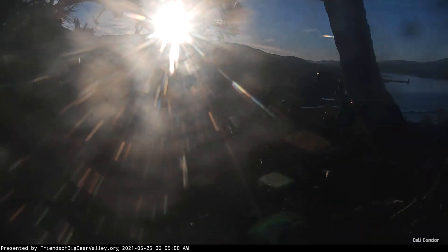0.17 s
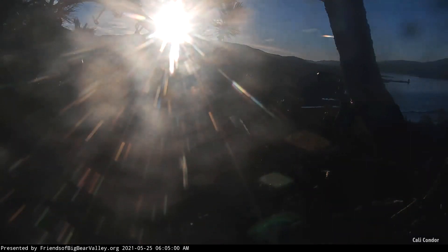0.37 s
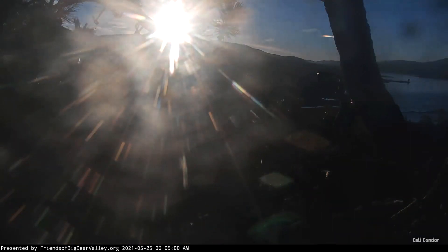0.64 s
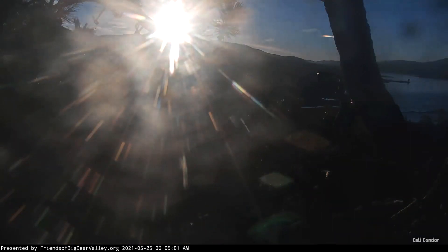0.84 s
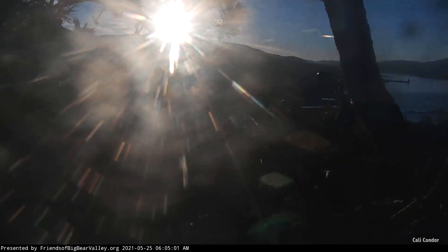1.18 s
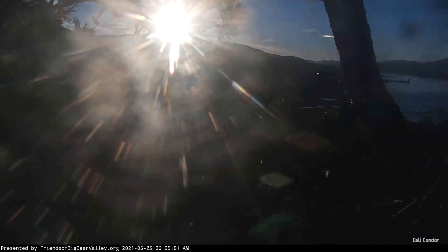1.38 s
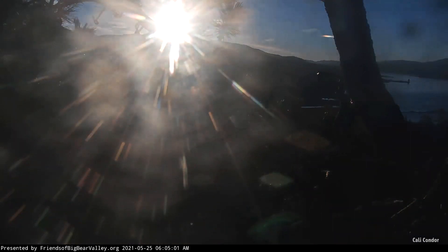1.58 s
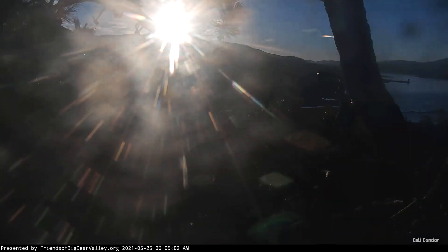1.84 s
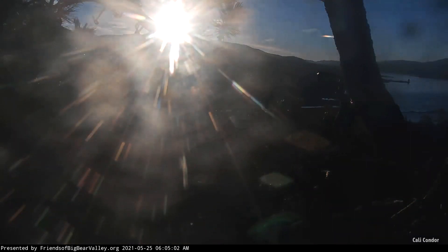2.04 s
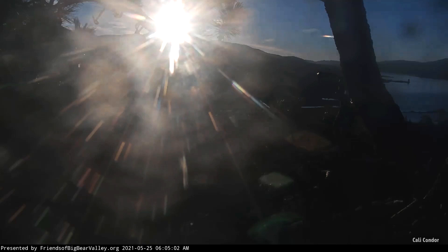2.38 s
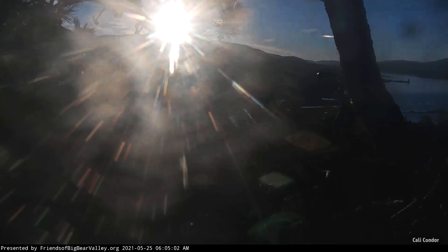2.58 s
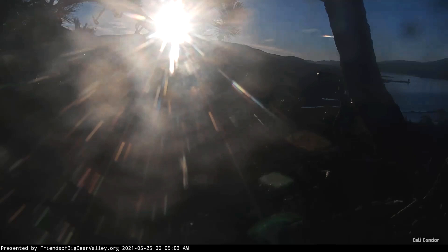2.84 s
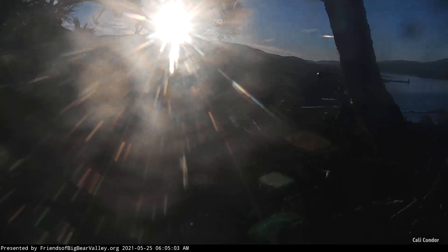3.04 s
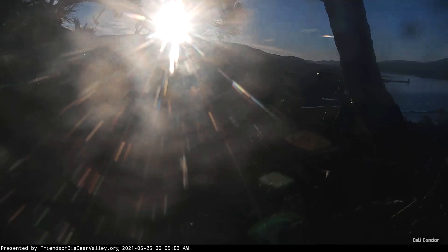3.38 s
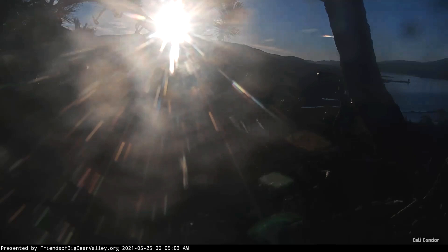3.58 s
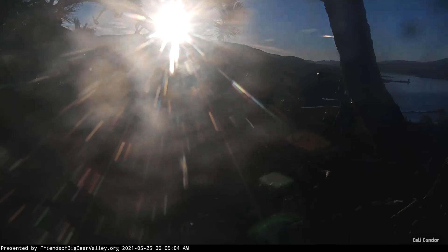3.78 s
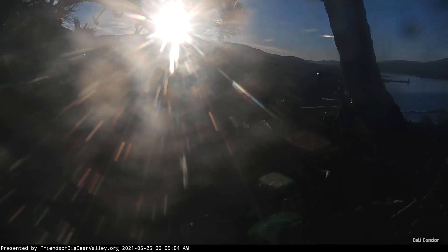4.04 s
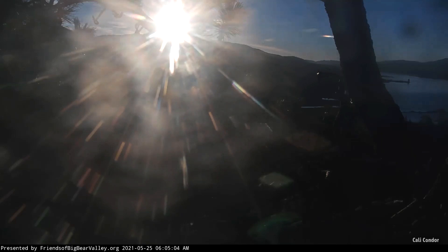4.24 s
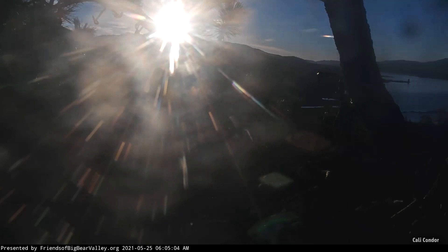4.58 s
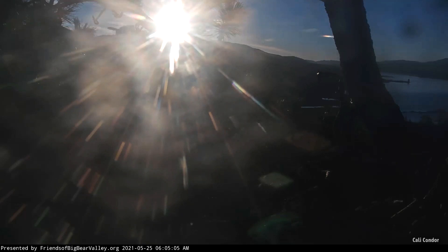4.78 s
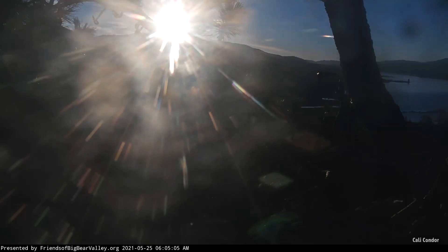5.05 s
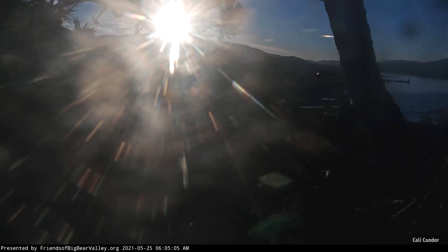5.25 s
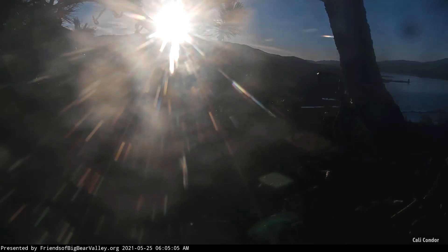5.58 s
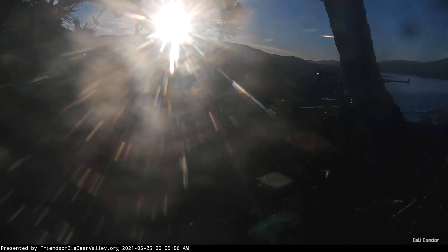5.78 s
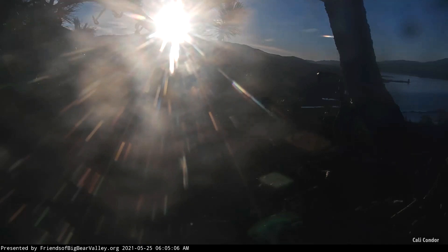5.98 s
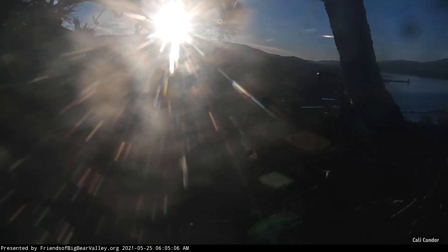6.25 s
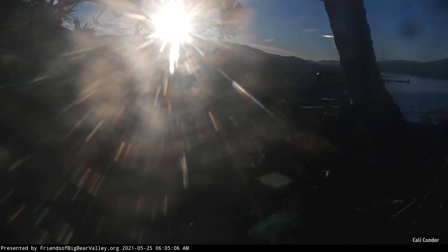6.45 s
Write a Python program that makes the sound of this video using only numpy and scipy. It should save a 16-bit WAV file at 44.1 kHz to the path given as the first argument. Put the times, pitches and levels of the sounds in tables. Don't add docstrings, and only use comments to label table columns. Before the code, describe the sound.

A quiet forest at dawn, heard from a small microphone in a tree. One bird repeats a short nasal, upward-arching call for three seconds over thin whistles, falling chips and quick trills. A two-note see-saw song follows, then the birds thin out and claws rasp, tick and knock on bark very close, loudest near the end. Low throbbing hum, soft air and a distant chorus lie beneath, and notes scatter in a lumpy woodland echo.

```python
import sys
import numpy as np
from scipy import signal
from scipy.fft import rfft, irfft, next_fast_len
from scipy.io import wavfile
from scipy.ndimage import uniform_filter1d, map_coordinates

SR = 44100
rng = np.random.default_rng(int(sys.argv[2]) if len(sys.argv) > 2 else 0)


def put_to_file(sound):
    columns = np.atleast_2d(sound).T
    safe = np.clip(columns, -1, 1)
    whole_steps = np.round(safe * 32767)
    wavfile.write(sys.argv[1], SR, whole_steps.astype(np.int16))


def voltage_ratio(decibels):
    exponent = np.asarray(decibels, float) / 20
    return 10 ** exponent


N = 292383


def unit(x):
    return x / np.sqrt(np.mean(x ** 2) + 1e-20)


def along(points, hz):
    f, v = np.transpose(points)
    return np.interp(np.log(hz + 1), np.log(f + 1), v)


def wobble(rate, size=N):
    knots = rng.standard_normal(int(size * rate / SR) + 4)
    return map_coordinates(knots, [np.arange(size) * rate / SR])


def filtered(x, response):
    m = next_fast_len(N + SR // 2)
    return irfft(rfft(x, m) * response(np.fft.rfftfreq(m, 1 / SR)), m)[:N]


def resonant(x, modes):
    def response(f):
        total = 0
        for k, (centre, width, db) in enumerate(modes):
            total = total + (-1) ** k * voltage_ratio(db) * 1j * f * width / (centre * centre - f * f + 1j * f * width)
        return total
    return filtered(x, response)


def rush(spectrum, patchy_db):
    z = signal.stft(rng.standard_normal(N), nperseg=512)[2]
    field = uniform_filter1d(rng.standard_normal(z.shape), 4, 0)
    field = uniform_filter1d(field, 6, 1)
    x = signal.istft(z * voltage_ratio(patchy_db * unit(field)), nperseg=512)[1][:N]
    return unit(filtered(x, lambda hz: voltage_ratio(along(spectrum, hz))))


def add(track, s, x):
    part = track[round(s * SR):][:len(x)]
    part += x[:len(part)]


def bend(length, first, middle, last, late=1):
    u = np.arange(round(length * SR)) / (length * SR)
    v = u ** late
    return u, first * (1 - v) * (1 - 2 * v) + 4 * middle * v * (1 - v) + last * v * (2 * v - 1)


def background():
    # frequency in Hz, level in dB (air: dB per Hz).
    far_spectrum = [(500, -120), (1200, -23), (1600, -16), (2000, -10), (2500, -6), (2850, -2.5),
                    (3300, -7.5), (3900, -21), (4600, -35.5), (6000, -26), (7500, -45), (10000, -120)]
    hum_spectrum = [(60, -120), (120, -26), (170, -11), (220, 4), (260, -2), (320, -12), (420, -41),
                    (900, -120)]
    haze_spectrum = [(3500, -120), (4600, -14), (5600, 0), (6500, -2), (7400, -16), (9000, -120)]
    air_spectrum = [(12, -40), (30, -14), (70, -4), (136, -5.5), (251, -7), (518, -15.5), (665, -12.5),
                    (1660, -20.5), (1860, -23), (2140, -23), (2820, -26.5), (4050, -25), (12700, -32),
                    (15400, -46.5)]
    # time in seconds, level in dB.
    chorus_level = [(0, -51), (.3, -53), (.6, -48), (1.15, -45.5), (1.86, -47.5), (2.16, -46), (2.82, -48),
                    (3.06, -52.5), (3.64, -49.5), (4.01, -60), (4.25, -55), (5, -60), (5.3, -55),
                    (5.69, -60), (6.06, -59), (6.18, -49), (6.33, -60.5), (6.63, -45.5)]
    throb_level = [(0, -47), (.3, -53), (.66, -49), (1.2, -58.5), (1.5, -54.5), (1.9, -48.5), (2.2, -53),
                   (2.6, -51), (3.02, -59), (3.25, -49.5), (3.7, -52.5), (4.3, -54), (5.3, -49.5),
                   (5.56, -60), (5.85, -48), (6.33, -56), (6.63, -49.5)]
    twitter_level = [
        (0, -76),
        (1.3, -74),
        (1.45, -64),
        (1.6, -74),
        (2.9, -74),
        (3.1, -66),
        (3.5, -65),
        (3.75, -66),
        (3.9, -78),
        (6.63, -78),
    ]
    t = np.arange(N) / SR
    far_db = np.interp(t, *np.transpose(chorus_level)) + 0.81 * wobble(25)
    far = voltage_ratio(far_db) * rush(far_spectrum, patchy_db=3.5)
    hum_db = np.interp(t, *np.transpose(throb_level)) + 1.5 * wobble(9)
    hum = voltage_ratio(hum_db) * rush(hum_spectrum, patchy_db=1.5)
    twitter_db = np.interp(t, *np.transpose(twitter_level)) + 2.5 * wobble(30)
    twitter = voltage_ratio(twitter_db) * rush(haze_spectrum, patchy_db=4)
    return far + twitter + hum + voltage_ratio(-50) * rush(air_spectrum, patchy_db=2.0)


def notes():
    # start in seconds, length in seconds, pitch in Hz,
    # peak in dB.
    held = [(.09, .105, 3250, -47), (.247, 0.15, 3295, -44), (.42, .03, 5580, -58), (.52, .075, 5750, -62),
            (2.05, .075, 3240, -42), (4.629, .175, 3790, -54), (4.946, .12, 3243, -41.5),
            (5.095, .225, 3315, -41.5), (5.11, .02, 2190, -53), (5.326, .17, 3310, -64),
            (6.215, .009, 6300, -47), (6.215, .009, 4950, -53), (1.41, .018, 5650, -57),
            (6.088, .01, 7200, -58), (5.93, .04, 2145, -57), (6.105, 0.037, 2325, -47)]
    thrown = [(0, .028, 2860, -39), (.536, .035, 2855, -37), (.6, 0.069, 2880, -40), (.66, 0.12, 2880, -49),
              (1.026, .06, 3010, -38), (1.087, .13, 2960, -45), (1.528, .12, 2710, -52),
              (1.793, 0.045, 2630, -45), (1.87, .013, 2770, -38), (2.054, 0.076, 2720, -40.5),
              (1.048, .006, 2950, -33), (2.198, .018, 3150, -42), (2.198, .018, 2800, -42),
              (2.245, .02, 2780, -44), (2.386, 0.028, 2528, -42), (2.766, .028, 2788, -43.5),
              (5.648, .1, 2600, -48.5), (5.657, 0.11, 2962, -56), (6.04, .022, 3050, -50),
              (.39, .016, 2880, -43), (3.3, .016, 2700, -44)]
    # start in seconds, length in seconds, first Hz, last Hz, peak in dB.
    hooks = [(.07, .03, 3130, 3250, -48), (2.32, .026, 2600, 2900, -43), (1.325, .022, 5450, 5750, -55),
             (1.516, .12, 3460, 3730, -54.5), (2.422, .06, 2590, 2920, -39),
             (3.175, .048, 2640, 2880, -33.5), (5.222, .075, 4600, 4170, -58),
             (5.458, .12, 3003, 2880, -48), (5.46, .1, 2500, 2160, -57), (5.58, 0.0675, 2610, 2943, -37.5),
             (6.06, .036, 3084, 2765, -33), (6.15, .165, 2900, 2654, -40), (6.153, .065, 2990, 2740, -42),
             (6.358, .042, 2546, 2697, -49)]
    slides = [(.017, .078, 4570, 4220, -55), (.107, .066, 4220, 4120, -58), (.19, .09, 4150, 4050, -63),
              (3.465, .035, 4900, 5150, -61), (3.63, .03, 4950, 5150, -63), (3.335, .016, 4300, 3400, -54),
              (.39, .12, 4450, 4940, -56.5), (3.08, .027, 3400, 2700, -38), (3.108, .03, 2700, 2900, -36),
              (2.326, .025, 4460, 4780, -55), (2.357, .11, 4000, 3580, -51.4),
              (3.295, .04, 4900, 5200, -58), (5.51, .045, 2820, 2960, -38),
              (5.768, .075, 3000, 3160, -44.5), (6.026, .016, 2780, 3010, -37),
              (6.043, .035, 7300, 7190, -59), (6.124, .09, 7080, 6850, -58), (5.3, 0.288, 4066, 3950, -58)]
    plunges = [
        (1.132, .015, 5500, 3380, -45),
        (1.146, .01, 6400, 3700, -49),
        (3.051, .026, 5950, 3000, -51),
        (3.074, .011, 6200, 3700, -46),
        (3.198, .034, 5850, 2850, -47.5),
        (3.23, .012, 6000, 3600, -48),
        (3.086, .017, 5100, 3400, -49),
        (3.243, .014, 5300, 3500, -51),
        (1.157, .009, 5100, 3900, -48),
    ]
    # start in seconds, chip length in seconds, chip dB, note Hz, note dB.
    seesaw = [
        (2.65, .012, -53, 3510, -45.5),
        (2.829, .01, -44.5, 3570, -41.5),
        (3.011, .02, -46, 3560, -39.5),
        (3.195, 0.023, -44.5, 3750, -42),
        (3.355, .03, -45.5, 3800, -42.5),
        (3.52, .03, -46, 3830, -44),
        (3.69, .02, -52, 3850, -66),
    ]
    held_bow = 0.0061
    hook_done, slide_done, plunge_done = .95, .47, .34
    chip_hz, chip_mid_hz, chip_end_hz = 4500, 4170, 3510
    note_lag_s, note_s, note_floor_hz, note_ease = .074, 0.0297, 3480, 0.98
    rows = []
    for s, length, hz, db in list(held) + list(thrown):
        end_hz = hz * (1 - held_bow)
        rows.append((s, length, end_hz, hz, end_hz, db))
    for table, done in ((hooks, hook_done), (slides, slide_done), (plunges, plunge_done)):
        for s, length, first, last, db in table:
            rows.append((s, length, first, first + done * (last - first), last, db))
    for s, length, chip_db, hz, note_db in seesaw:
        rows.append((s, length, chip_hz, chip_mid_hz, chip_end_hz, chip_db))
        rows.append((s + note_lag_s, note_s, note_floor_hz, hz, note_ease * hz, note_db))
    return rows


def whistles():
    steep_hz_per_s = 45000
    flutter_per_db = .09
    out = np.zeros((2, N))
    for s, length, first, middle, last, db in notes():
        u, pitch = bend(length, first, middle, last)
        steep = int((first - last) / length > steep_hz_per_s)
        pitch = pitch * (1 + 0.001 * wobble(43, size=len(u)) + .002 * wobble(14, size=len(u)))
        phase = 2 * np.pi * np.cumsum(pitch) / SR
        flutter_db = (0.74 + flutter_per_db * max(-44 - db, 0)) * wobble(54, size=len(u))
        husk_db = steep * 3 * wobble(300, size=len(u))
        swell = np.sin(np.pi * u) ** 0.38 * voltage_ratio(db + flutter_db + husk_db)
        add(out[steep], s, swell * (np.sin(phase) + voltage_ratio(-38) * np.sin(2 * phase)))
    return out


def claws():
    # start in seconds, peak in dB, bright part in dB, centre in Hz.
    scratches = [(0.1404, -40, -11, 3250), (0.6417, -31, -14.5, 2960), (.7455, -44, -10, 3000),
                 (.8445, -37, -14, 2900), (1.955, -37, -30, 2900), (2.6435, -31, -35, 3050),
                 (1.638, -45, -7, 2720), (2.048, -37, -34, 2970), (2.3582, -37, -32, 2760),
                 (3.767, -37.5, -18, 2750), (3.8145, -30, -32, 2740), (3.9411, -28.5, -34, 2490),
                 (4.0184, -32, -15, 2230), (4.0497, -40, -22, 3510), (4.196, -36, -22, 1850),
                 (4.2607, -41.5, -24, 2600), (4.3885, -32, -35, 2560), (4.5516, -35, -21, 2720),
                 (4.862, -44, -21.5, 2910), (5.7422, -33, -11, 2390), (5.7579, -22.5, -19, 2710),
                 (5.7826, -36, -15, 3060), (5.8022, -36, -16, 3000), (5.8626, -36, -22, 2800),
                 (6.0228, -30, -15, 3400), (6.0804, -31, -18, 2720), (6.161, -24, -33, 2700),
                 (6.191, -33, -14, 2600), (6.2016, -22.5, -29, 2620), (6.209, -34, -21, 2770),
                 (6.2167, -35, -14, 2760), (6.3698, -36.5, -17, 2620), (6.4817, -35.5, -22.5, 3220)]
    rasps = [(0.0014, -29.5, -41, 2800), (0.6264, -29.5, -28, 2840), (0.8183, -30, -20.5, 2840),
             (2.9772, -37.5, -12, 2670), (3.3932, -36, -16, 2910), (3.7002, -38.5, -17, 2800),
             (4.5291, -39.5, -19.5, 2600), (4.6405, -40.5, -16, 3050), (4.6625, -29.5, -20, 3110),
             (4.7279, -24, -16.5, 2950), (4.7614, -46, -21, 3380), (5.8254, -33.5, -26, 2940),
             (6.0074, -25.5, -28, 2730), (6.1675, -25, -24, 2730), (6.236, -29.5, -15, 2720),
             (6.5925, -36, -14, 2570), (6.6126, -33, -21, 3050)]
    # start in seconds, peak in dB, limb pitch in Hz.
    knocks = [(.339, -48, 581), (.815, -34.5, 563), (1.147, -47, 536), (1.218, -36, 596), (1.229, -29, 774),
              (1.27, -34, 603), (1.32, -41.5, 650), (1.499, -43, 848), (1.839, -40, 573), (2.357, -49, 560),
              (2.91, -48.5, 416), (3.276, -42, 700), (3.39, -31, 565), (3.94, -47, 748), (4.196, -46, 1410),
              (4.863, -43.5, 640), (4.955, -42, 479), (5.061, -44, 470), (5.167, -48, 460),
              (5.741, -46, 662), (5.822, -38, 1450), (6.006, -40, 1480), (6.117, -39, 533),
              (6.16, -20, 1180), (6.209, -29, 960), (6.479, -45, 945), (6.573, -43, 523), (6.617, -33, 550)]
    # centre in Hz, width in Hz, level in dB.
    bark_modes = [(2900, 1100, -2), (3700, 2400, -13)]
    bright_modes = [(5770, 900, 3), (7600, 2800, -8)]
    tick_s, rasp_s = 0.0082, .022
    limb_t60_s, damping_s_per_db = 0.013, .00022
    body, bright, knock = np.zeros(N), np.zeros(N), np.zeros(N)
    t = np.arange(SR // 16) / SR
    for rows, length in ((scratches, tick_s), (rasps, rasp_s)):
        for s, db, bright_db, hz in rows:
            slips = rng.standard_normal((2, len(t))) * voltage_ratio(1.4 * wobble(430, size=len(t)))
            run = slips * np.exp(-(t / length) ** 4 - .5 * t / length) * (1 - np.exp(-t / 0.00019))
            ring = signal.iirpeak(hz, 2.8, SR)
            flake = signal.lfilter(*ring, signal.lfilter(*ring, run[0]))
            thud = uniform_filter1d(uniform_filter1d(run[1], size=9), size=12)
            add(body, s, voltage_ratio(db - 1.0) * flake / np.abs(flake).max())
            add(bright, s, voltage_ratio(db + bright_db + 11.5) * run[1])
            add(knock, s, voltage_ratio(db - 5.5) * thud)
    for s, db, hz in knocks:
        t60 = max(limb_t60_s - damping_s_per_db * (db + 45), .003)
        modes = np.sin(2 * np.pi * hz * t) + 0.59 * np.sin(2 * np.pi * 1.676 * hz * t)
        add(knock, s, voltage_ratio(db + 9 - 60 * t / t60) * modes * (1 - np.exp(-t / 0.00069)))
    crackle = resonant(resonant(bright, [(6700, 3300, 0)]), bright_modes)
    wood = 1.06 * body + 0.34 * resonant(body, bark_modes) + crackle + knock
    return filtered(wood, lambda f: 1 / (1 + 1j * f / 12000) ** 4)


def syllables():
    # start in seconds, length in seconds, first Hz, last Hz, level in dB.
    mutters = [
        (.24, .047, 455, 525, -43),
        (2.598, .052, 530, 640, -35),
        (3.262, .05, 470, 455, -39),
    ]
    # start in seconds, length in seconds, first Hz, last Hz, level in dB.
    climbs = [
        (.411, .034, 550, 750, -40),
        (.898, .05, 530, 790, -38),
        (1.198, .03, 510, 635, -37),
        (1.415, .045, 490, 780, -37),
        (1.668, .035, 550, 780, -38),
        (1.966, .022, 530, 650, -39),
        (2.117, .036, 560, 770, -34),
        (2.466, .036, 510, 760, -35),
        (2.572, .034, 740, 640, -35),
        (3.024, .021, 515, 665, -37),
    ]
    # start in seconds, length in seconds, first Hz, top Hz, level in dB.
    arches = [
        (.454, .064, 800, 960, -26.5),
        (.95, .074, 815, 1003, -26.5),
        (1.226, .064, 680, 795, -36),
        (1.462, .058, 790, 921, -29.5),
        (1.7, .042, 790, 890, -36),
        (1.99, .066, 689, 813, -33),
        (2.15, .048, 800, 852, -33.5),
        (2.507, .072, 770, 949, -29),
        (3.044, .036, 695, 725, -37),
    ]
    mutter_bow_hz_per_s = 900
    fall_back = .88
    rows = []
    for s, length, first, last, db in mutters:
        rows.append((s, length, first, (first + last) / 2 + mutter_bow_hz_per_s * length, last, db, True))
    for s, length, first, last, db in climbs:
        rows.append((s, length, first, (first + last) / 2, last, db, False))
    for s, length, first, top, db in arches:
        rows.append((s, length, first, top, top - fall_back * (top - first), db, True))
    return rows


def nasal():
    # frequency in Hz, level in dB.
    beak = [(700, -21), (1000, -25.5), (1700, -12), (2000, -18), (2300, -11), (2480, -2), (2750, 0),
            (2870, 3.5), (2980, -4), (3250, -1), (3450, -9), (3950, -15), (4300, -30), (4700, -45),
            (6200, -24), (9000, -50)]
    late_top, flat_top = 1.33, 1.3
    low_voice_hz, low_span_hz, thin_db = 700, 50, -6
    upper_db = -8
    out, k = np.zeros(N), np.arange(1, 15)[:, None]
    for s, length, first, middle, last, db, arched in syllables():
        u, pitch = bend(length, first, middle, last, late_top ** arched)
        if arched:
            climb = middle - first
            pitch = middle - climb * np.abs((middle - pitch) / climb) ** flat_top
        pitch = pitch * (1 - 0.02 * arched * u ** 5 + 0.0043 * wobble(142, size=len(u)))
        low = np.clip((low_voice_hz - pitch) / low_span_hz, 0, 1)
        voice_db = np.where(k < 5, thin_db * low, upper_db * np.where(k == 5, 1 - low, 1))
        phase = k * 2 * np.pi * np.cumsum(pitch) / SR
        stack = np.sum(voltage_ratio(along(beak, k * pitch) + voice_db) * np.sin(phase), axis=0)
        swell = np.abs(np.sin(np.pi * u ** (1.15 if arched else 1.6))) ** (.4 if arched else .7)
        add(out, s, stack * swell * voltage_ratio(db + (3 - 1.8 * arched) * wobble(120, size=len(u))))
    return out


def trills():
    # start in seconds, length in seconds, chips per second, fall in Hz, level in dB.
    trill_rows = [
        (1.165, .022, 95, 2430, -53),
        (2.142, .13, 110, 700, -58.5),
        (2.76, 0.061, 40, 1100, -54),
        (2.946, .059, 45, 1100, -52),
        (3.098, .022, 97, 2800, -52),
        (3.132, .069, 47, 1000, -50),
        (3.236, 0.04, 83, 2620, -50),
    ]
    trill_hz, hz_per_chip_rate = 3820, 7.8
    out = np.zeros(N)
    for s, length, rate, fall_hz, db in trill_rows:
        u = np.arange(round(length * SR)) * rate / SR % 1
        fall = fall_hz * (.5 - u + .05 * wobble(300, size=len(u)))
        pitch = trill_hz + hz_per_chip_rate * rate + fall
        shape = np.sin(np.pi * u) ** 1.7 * voltage_ratio(db + 2.7 * wobble(120, size=len(u)))
        add(out, s, shape * np.sin(2 * np.pi * np.cumsum(pitch) / SR))
    return out


def faint_snaps():
    # start in seconds, peak in dB.
    snaps = [
        (2.363, -47),
        (2.9771, -49),
        (3.2949, -48),
        (4.132, -51),
        (4.4243, -47),
        (4.7277, -52),
        (5.0374, -47),
        (6.1365, -43),
    ]
    out, t = np.zeros(N), np.arange(SR // 200) / SR
    for s, db in snaps:
        grit = uniform_filter1d(rng.standard_normal(len(t)), size=2)
        add(out, s, voltage_ratio(db + 4 - 60 * t / .004) * grit)
    return out


def forest(x):
    # frequency in Hz, t60 in seconds.
    forest_t60 = [(1000, 0.86), (3000, 0.89), (4500, 0.78), (7000, 0.083)]
    out, step = np.zeros(N), SR // 3
    for at in range(0, N, step):
        hz, t, z = signal.stft(rng.standard_normal(SR), SR, nperseg=256)
        decay = voltage_ratio(-60 * t / along(forest_t60, hz)[:, None]) + 4.4 * voltage_ratio(-60 * t / 0.039)
        tail = signal.istft(z * decay, SR, nperseg=256)[1]
        tail = tail * voltage_ratio(2.5 * wobble(40, size=len(tail)))
        add(out, at / SR + .008, signal.fftconvolve(x[at:at + step], tail / np.linalg.norm(tail)))
    return out


def scene():
    calls, (songs, chips), near = nasal(), whistles(), claws()
    chips = chips + trills()
    wet = forest(voltage_ratio(-8.5) * calls + voltage_ratio(-10) * songs + voltage_ratio(-3) * chips + voltage_ratio(-9.5) * near)
    return (calls + songs + chips + near + wet + background() + faint_snaps())[None]


def low_pass(x):
    return signal.sosfilt(signal.butter(12, 15540, fs=SR, output="sos"), x)


def record(dry):
    top_hz = 15540
    mix = filtered(dry[0], lambda f: f < top_hz)[None]
    return low_pass(mix)


dry = scene()
out = record(dry)
put_to_file(out)
```